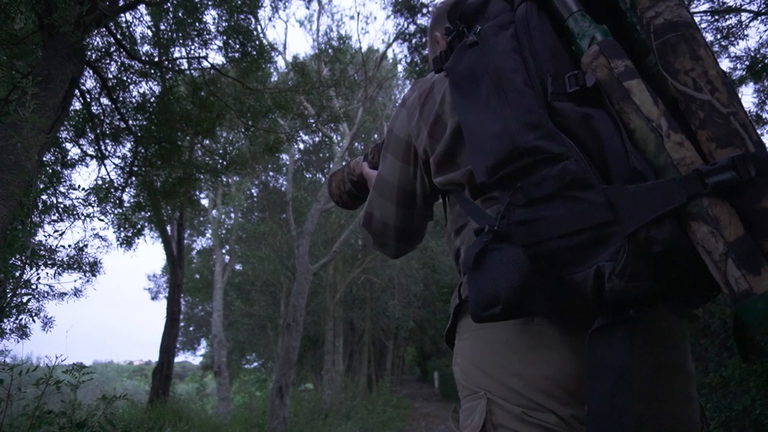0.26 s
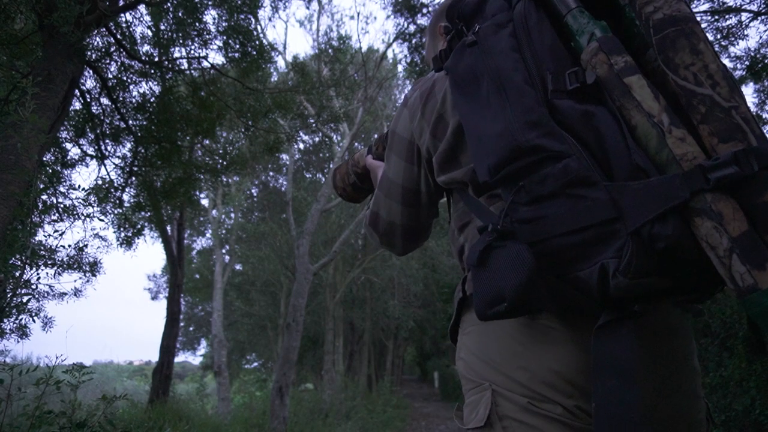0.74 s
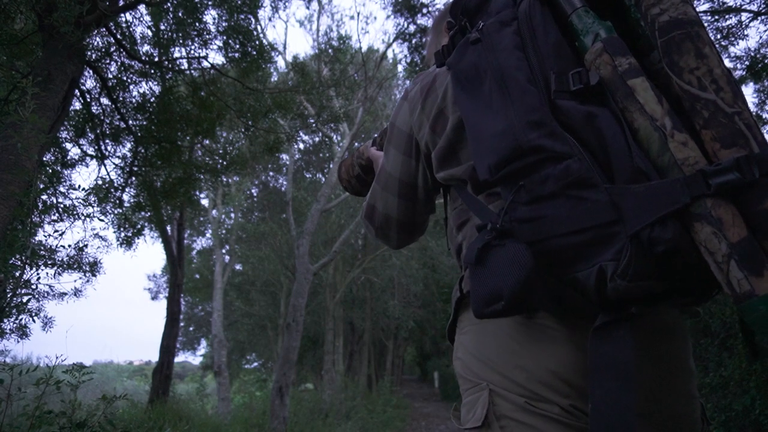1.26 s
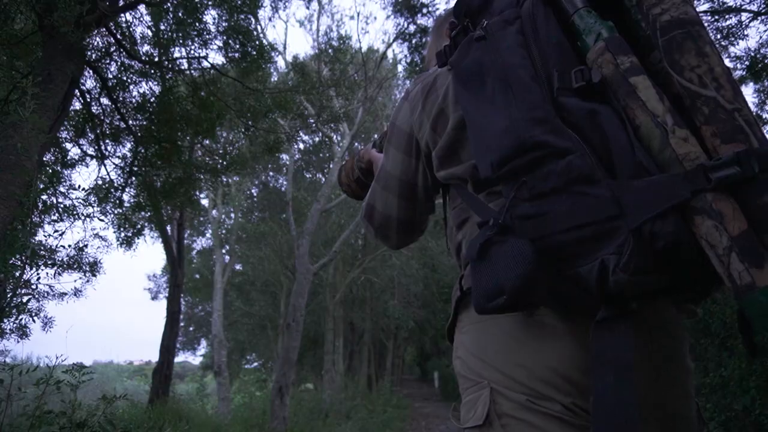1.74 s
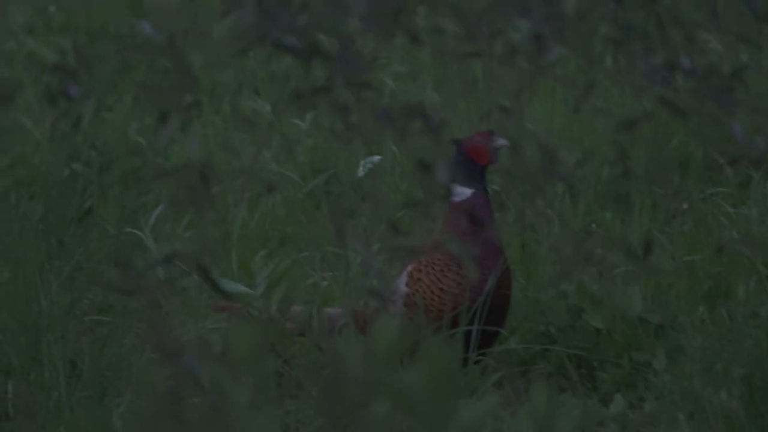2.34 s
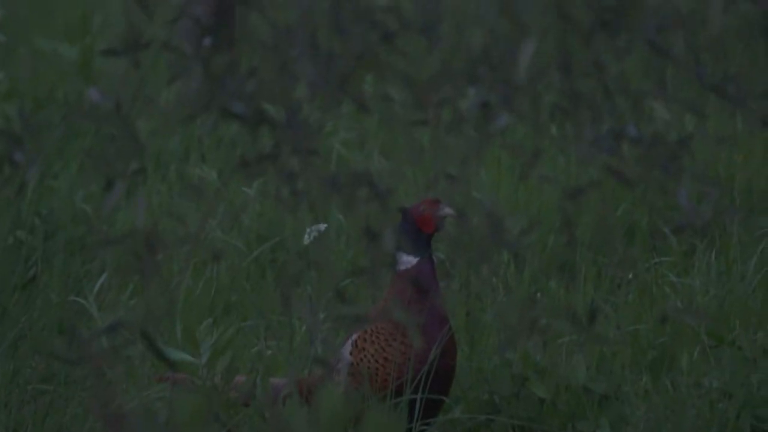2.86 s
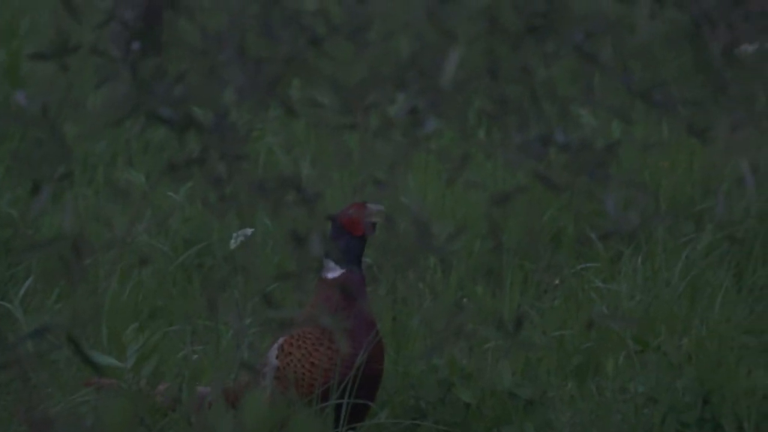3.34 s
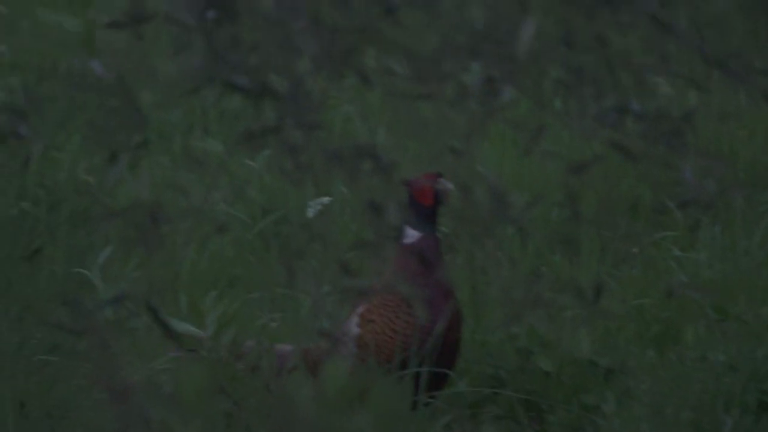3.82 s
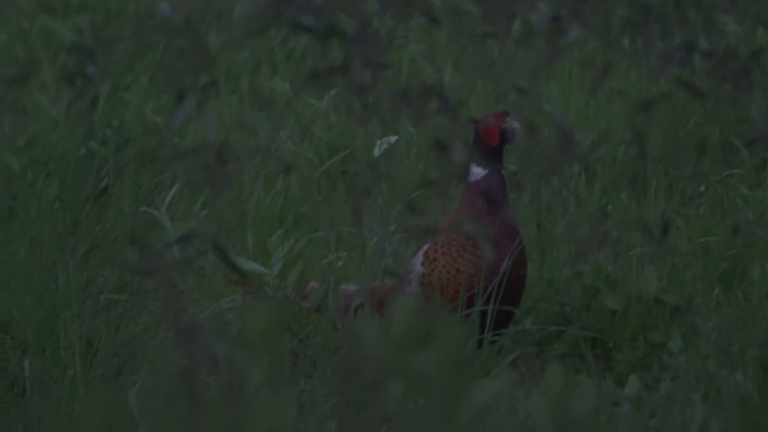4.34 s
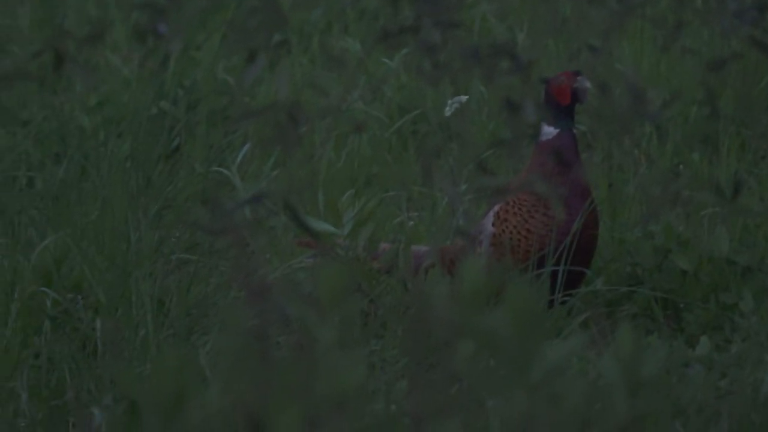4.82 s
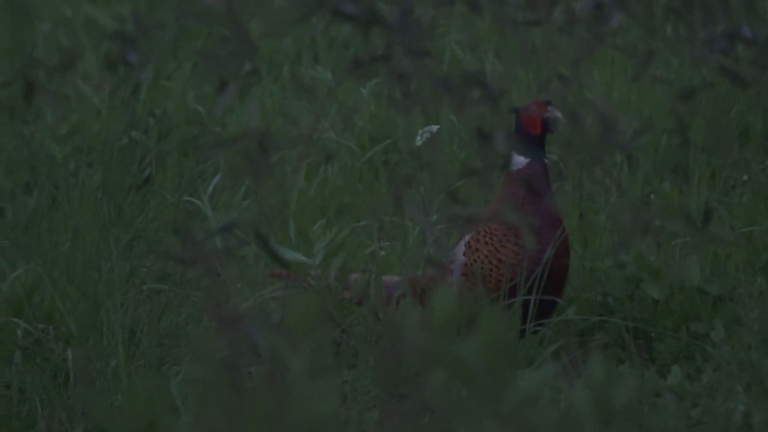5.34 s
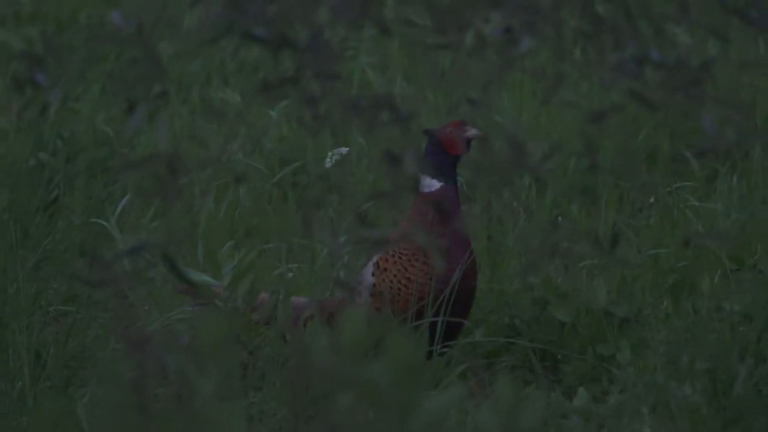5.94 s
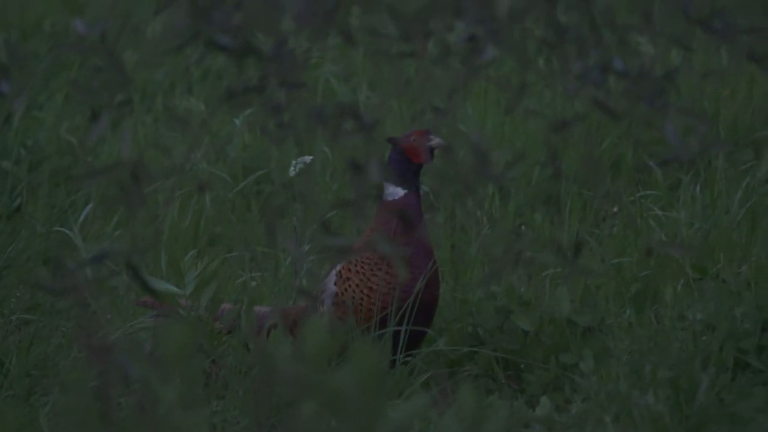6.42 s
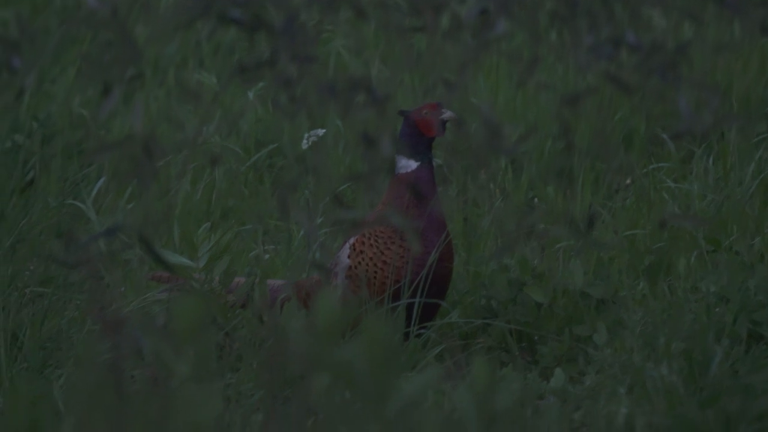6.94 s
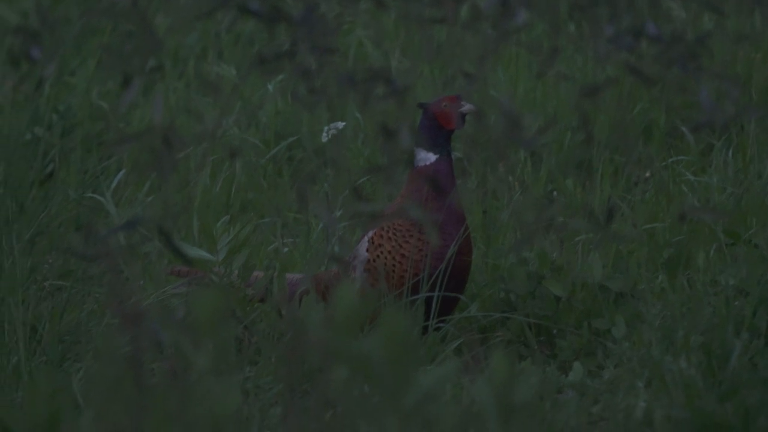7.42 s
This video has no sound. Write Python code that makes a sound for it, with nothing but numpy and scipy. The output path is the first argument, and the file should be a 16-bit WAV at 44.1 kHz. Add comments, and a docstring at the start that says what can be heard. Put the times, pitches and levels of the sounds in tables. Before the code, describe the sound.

A low, steady hush of still air lies over a woodland edge for about seven and a half seconds. Close to the microphone, a boot lands softly at around 0.2 seconds, with a rustle of leaf litter and clothing. Twigs snap sharply at about 0.5, 0.8 and 0.9 seconds, and the rustle fades away by about 2.3 seconds. A cock pheasant crows three times across the grass, at about 1.1, 3.4 and 5.6 seconds. Each crow is very short and loud: a high, harsh, rasping shriek followed by a quick stutter, with a brief echo among the trunks. Throughout, songbirds whistle and chirp faintly from deep in the trees. From about 4.6 to 5.7 seconds, one distant bird repeats a buzzy two-note chirp, a little softer each time. Only faint whistles and the quiet air remain at the end.

```python
"""A cock pheasant crows three times across the grass at a woodland edge, at dusk, on one microphone.
Each crow is a harsh shriek and a short stutter, sounded by the syrinx, rasping through the windpipe
and ringing on among the trunks. First, close by, a walker takes a last step on leaf litter and a few
twigs snap. Deep in the trees, songbirds whistle and chirp over a quiet hush of air."""
import sys
import numpy as np
from scipy import signal
from scipy.fft import rfft, irfft
from scipy.io import wavfile
from scipy.ndimage import uniform_filter1d

SR = 44100
rng = np.random.default_rng(int(sys.argv[2]) if len(sys.argv) > 2 else 0)


def dump(signal):
    """Clip the signal to [-1, 1] and save it as 16-bit WAV at the path in sys.argv[1]."""
    limited = np.clip(np.atleast_2d(signal).T, -1, 1)
    pcm = np.round(limited * 32767).astype(np.int16)
    wavfile.write(sys.argv[1], SR, pcm)


N = 338247
TIME = np.arange(N) / SR

# still evening air all around the microphone: frequency_hz, density_db
AIR_SPECTRUM = [(12, -35.5), (20, -3), (53, -1.5), (221, -5.5), (284, -5.5), (317, -6.5), (355, -6.5),
                (419, -8.5), (469, -8), (1320, -15), (1430, -18.5), (1890, -19), (2060, -23), (5170, -23),
                (15800, -27)]
# the farthest birds, blurred together: frequency_hz, gain_db
CHORUS_SPECTRUM = [(900, -37), (1500, -5.5), (2100, -1), (3000, -8.5), (4000, -11), (6000, -35)]
# how long the wood rings: frequency_hz, t60_s
ECHO_DECAY = [(400, 1), (1000, 0.6753), (2000, 0.77), (3450, 0.59), (3880, 0.68), (4300, .5), (5000, 0.5),
              (8000, 0.31), (14000, 0.54)]
# tone of the echo off the trunks: frequency_hz, gain_db
ECHO_SPECTRUM = [(400, -7), (850, -1), (1000, -4.5), (1200, -3.5), (2000, -9), (3000, -12.5), (3550, -13),
                 (3880, -14.5), (4150, -14), (5000, -9), (8000, -8), (14000, -11)]

# fluted whistles deep in the trees:
# start_s, length_s, level_db, start_hz, middle_hz, end_hz, swing_hz, swings_per_s
BIRD_WHISTLES = [ (.868, 0.27, -57, 1650, 1920, 1690, 87, 28),
                 (1.645, 0.36, -59.5, 2200, 2140, 2330, 200, 6.9),
                 (2.081, 0.19, -60, 2690, 2620, 2670, 102, 14), (3.95, 0.3, -69, 2080, 2110, 2123, 20, 8.7),
                 (4.614, 0.17, -60, 2275, 2280, 2240, 35, 8.5),
                 (5.13, 0.15, -63.5, 2580, 2480, 2520, 22, 10.4),
                 (6.043, 0.18, -64, 3280, 3390, 3360, 22, 12),
                 (6.364, 0.104, -64.5, 2080, 2027, 2080, 20, 9.6),
                 (6.718, 0.24, -68, 2990, 3000, 3030, 11, 8.3),
                 (6.835, 0.38, -62.5, 2400, 2180, 2160, 110, 3.1),
                 (7.27, 0.062, -61, 3300, 3200, 3260, 40, 20.2)]
# quick downward slurs: start_s, length_s, level_db, start_hz, end_hz
BIRD_SLURS = [(1.592, 0.028, -60, 2600, 2150), (2.303, 0.022, -55, 3045, 1390),
              (4.08, 0.055, -56, 3210, 2770), (4.468, .045, -63, 1700, 1250),
              (4.581, .11, -60.5, 3840, 3170), (6.2, .065, -58, 2864, 2190), (7.23, .07, -64.5, 1900, 1570)]
# the two notes of one bird's chirp:
# delay_s, length_s, level_db, start_hz, middle_hz, end_hz, buzz_share (of the pitch)
CHIRP_NOTES = [(0, .052, -55.5, 3300, 2860, 2916, .07), (.055, 0.04, -55, 1832, 2210, 1880, 0.083)]

# a boot rolls from heel to toe near the microphone: start_s, level_db, pitch_hz
BOOT_THUDS = [(0.1442, -26.5, 460), (0.1697, -27.5, 570), (0.179, -28.5, 216), (.199, -28, 492),
              (0.211, -20, 624)]
# twigs and stalks breaking: start_s, knock_db, pitch_hz, crack_db
TWIG_SNAPS = [(0.0287, -32, 3670, -37), (0.0723, -38.5, 650, -38), (0.4875, -20, 1550, -46),
              (0.4879, -19, 5700, -20.5), (0.523, -43.5, 889, -30), (0.7762, -25.5, 1240, -32),
              (0.944, -28.5, 1400, -28.5), (2.3086, -42, 1100, -43), (4.588, -36, 1870, -54),
              (4.9812, -50, 4000, -44.5)]
# tone of a sharp crack: frequency_hz, gain_db
CRACK_SPECTRUM = [(200, -19), (1000, 0.5), (3000, 3), (6000, -1.5), (9000, -2.5), (16000, -10.5)]
# the walker's weight shifts on the litter: peak_s, level_db
WEIGHT_SHIFTS = [(0.161, -38), (.21, -46), (.385, -52.5), (.5, -55), (.725, -56)]
# rubbing leaf litter and clothes: frequency_hz, density_db
RUSTLE_SPECTRUM = [(50, -61), (130, -16.5), (200, -6), (450, -1.5), (1000, -2), (2000, -3.5), (3050, -7.5),
                   (6000, -12), (8800, -14), (15500, -26.5)]

# the pheasant's syllables; a crow opens on a full push of air and stutters on what is left:
# start_s, length_s, fade_s, level_db, shriek_hz, rasp_db, low_note_db, push_share (0-1)
CROW_SYLLABLES = [ (1.1149, .026, 0.06, -17, 3950, -2.5, -12, .85),
                  (1.185, 0.019, 0.027, -25, 3840, 0.5, -10, 0.14),
                  (3.4395, 0.046, 0.059, -19, 3922, -3, -17, 0.87),
                  (3.501, 0.0081, .022, -19, 3764, 0.5, -15.5, 0.16),
                  (3.516, 0.0097, 0.027, -21.5, 3766, -4.5, -12.5, 0.06),
                  (5.623, 0.039, 0.089, -18.5, 3925, -2, -15, 0.99),
                  (5.695, .019, 0.024, -26.5, 3830, 2, -7.5, 0.07)]
# resonances of windpipe and beak with the shriek at WINDPIPE_PITCH_HZ: centre_hz, width_hz, gain_db
WINDPIPE_RESONANCES = [(1037, 80, -17), (2016, 400, -15.5), (2936, 290, -8), (3533, 400, -3),
                       (3765, 280, -2), (4925, 400, -3.5), (5940, 1000, -17.5), (8650, 830, -35)]
WINDPIPE_PITCH_HZ = 3920
# the broad rasp between those resonances: frequency_hz, gain_db
RASP_SPECTRUM = [(300, -70.5), (550, -34.5), (750, -25.5), (1300, -26.5), (2500, -13.5), (4400, -24.5),
                 (5600, -27.5), (7000, -36), (8000, -31), (9500, -34), (12000, -36.5), (16000, -49)]


def gain_of(db):
    """Decibels to an amplitude factor."""
    return 10 ** (np.asarray(db) / 20)


def unit_rms(x):
    """The signal scaled to rms 1."""
    return x / np.sqrt(np.mean(x ** 2) + 1e-20)


def phase_of(hz):
    """Running phase of a pitch curve, in radians."""
    return 2 * np.pi * np.cumsum(hz) / SR


def value_at(table, hz):
    """Looks up a table on a log-frequency axis."""
    table_hz, values = np.transpose(table)
    return np.interp(np.log(hz + 1), np.log(table_hz), values)


def add(mix, start_s, sound):
    """Lays a sound into the mix."""
    part = mix[max(round(start_s * SR), 0):][:len(sound)]
    part += sound[:len(part)]


def colour(x, spectrum, size=4096):
    """Minimum-phase filter with the given spectrum."""
    log_gain = np.log(gain_of(value_at(spectrum, abs(np.fft.fftfreq(size, 1 / SR)))))
    taps = np.fft.ifft(np.exp(np.conj(signal.hilbert(log_gain)))).real
    return signal.fftconvolve(x, taps[:size // 2])[:len(x)]


def wander(count, rate_hz):
    """Smooth random drift of rms about 1, up to the given rate."""
    spectrum = rfft(rng.standard_normal(count + SR))
    hz = np.arange(len(spectrum)) * SR / (count + SR)
    return unit_rms(irfft(spectrum / (1 + (hz / rate_hz) ** 4)))[:count]


def evening_air(level_db=-59):
    """A low, almost steady hush of air."""
    air = unit_rms(colour(rng.standard_normal(N), AIR_SPECTRUM, size=16384))
    return air * gain_of(level_db + 0.27 * wander(N, rate_hz=4))


def background_dip(start_s=2.36, depth_db=-7.5, recovery_s=2.55):
    """The level of the distant background drops abruptly, then slowly returns."""
    return gain_of(np.interp(TIME, [start_s - .05, start_s, start_s + recovery_s], [0, depth_db, 0]))


def distant_chorus(level_db=-65.5):
    """Birds so far off that they blur into a flickering band of noise."""
    blur = unit_rms(colour(rng.standard_normal(N), CHORUS_SPECTRUM))
    return blur * gain_of(level_db + 1.5 * wander(N, rate_hz=12)) * background_dip()


def wood_echo(x, near_db=0, near_t60_s=0.24, build_s=0.018, far_db=-0.5, echoes_per_s=3000):
    """Trunks scatter sound back: a quick spray from near ones, then a long tail that loses its treble."""
    t = np.arange(SR) / SR
    near, far = rng.standard_normal((2, SR)) * (rng.random((2, SR)) < echoes_per_s / SR)
    hz, frame_s, bands = signal.stft(far, SR, nperseg=256)
    decay = gain_of(-60 * frame_s / value_at(ECHO_DECAY, hz)[:, None])
    opening = np.minimum(t / build_s, 1)
    far = signal.istft(bands * decay, SR, nperseg=256)[1][:SR] * opening
    near = near * opening * gain_of(-60 * t / near_t60_s)
    response = gain_of(far_db) * far / np.linalg.norm(far) + gain_of(near_db) * near / np.linalg.norm(near)
    return signal.fftconvolve(x, colour(response, ECHO_SPECTRUM))[:N]


def arch(length_s, start_hz, middle_hz, end_hz):
    """A pitch that bends smoothly through three values."""
    parabola = np.polyfit([0, .5, 1], [start_hz, middle_hz, end_hz], 2)
    return np.polyval(parabola, np.linspace(0, 1, int(length_s * SR)))


def bird_note(hz, level_db, warble_share, taper=.5):
    """A whistle along a pitch curve, with a fast uneven warble."""
    warbled_hz = hz * (1 + warble_share * wander(SR // 2, rate_hz=190)[:len(hz)])
    return gain_of(level_db) * unit_rms(np.sin(phase_of(warbled_hz)) * signal.windows.tukey(len(hz), taper))


def faint_birds(level_db=-67.5, centre_hz=2130, spread_octaves=0.73, length_s=.11, count=20):
    """Birds far back in the wood drop in plain notes at random times and pitches."""
    out = np.zeros(N)
    for slot, (shift, pitch, size, *bends) in enumerate(rng.uniform(-1, 1, (count, 6))):
        start_s = (slot + .5 + shift / 2) / count * N / SR
        pitches_hz = centre_hz * 2 ** (spread_octaves * pitch) * (1 + .035 * np.array(bends))
        add(out, start_s, bird_note(arch(length_s, *pitches_hz), level_db + 3 * size, warble_share=.005))
    return out * background_dip()


def songbirds():
    """From deep in the trees: swinging whistles, and slurs that fall ever faster."""
    out = np.zeros(N)
    for start_s, length_s, level_db, *pitches_hz, swing_hz, swings_per_s in BIRD_WHISTLES:
        hz = arch(length_s, *pitches_hz)
        hz += swing_hz * np.cos(2 * np.pi * swings_per_s * TIME[:len(hz)])
        add(out, start_s, bird_note(hz, level_db, warble_share=.014, taper=0.1))
    for start_s, length_s, level_db, start_hz, end_hz in BIRD_SLURS:
        hz = arch(length_s, start_hz, start_hz + 0.306 * (end_hz - start_hz), end_hz)
        add(out, start_s, bird_note(hz, level_db, warble_share=0.037))
    return out


def chirping_bird(start_s=4.583, every_s=.162, fade_db_per_s=7, flutter_db=-8, count=7):
    """One far bird repeats a buzzy two-note chirp, a little softer each time."""
    out = np.zeros(N)
    for elapsed_s in np.arange(count) * every_s:
        for delay_s, length_s, level_db, *pitches_hz, buzz_share in CHIRP_NOTES:
            note = bird_note(arch(length_s, *pitches_hz), level_db - fade_db_per_s * elapsed_s, buzz_share)
            flutter = gain_of(flutter_db) * wander(SR // 2, rate_hz=455)[:len(note)]
            add(out, start_s + elapsed_s + delay_s, note * (1 + flutter))
    return out


def rustle_gain(opening_db=-50.5, fade_db_per_s=17.5, floor_db=-65.5, cutoff_s=2.29, cutoff_db_per_s=130,
                rise_s=0.022, fall_db_per_s=126.5):
    """The rustle swells at each shift of weight, fades gradually, then cuts off at about 2.3 s."""
    parts = [gain_of(opening_db - fade_db_per_s * TIME),
             gain_of(floor_db - cutoff_db_per_s * np.maximum(TIME - cutoff_s, 0))]
    for peak_s, level_db in WEIGHT_SHIFTS:
        rise = np.clip(1 + (TIME - peak_s) / rise_s, 0, 1)
        parts.append(rise * gain_of(level_db - fall_db_per_s * np.maximum(TIME - peak_s, 0)))
    return np.linalg.norm(parts, axis=0)


def rustle(patchy_db=2.5):
    """Litter and clothes close by: many small rubs, each brief and with a pitch range of its own."""
    bands = signal.stft(rng.standard_normal(N), nperseg=256)[2]
    patches = uniform_filter1d(rng.standard_normal(bands.shape), size=14, axis=0)
    patches = unit_rms(uniform_filter1d(patches, size=2, axis=1))
    rubs = signal.istft(bands * gain_of(patchy_db * patches), nperseg=256)[1][:N]
    return rustle_gain() * unit_rms(colour(rubs, RUSTLE_SPECTRUM))


def snap(knock_db, hz, t60_s, crack_db, crack_t60_s=0.0061, overtone_ratio=1.6, overtone_db=-7):
    """A sharp crack and a short damped knock of wood or ground."""
    t = np.arange(3000) / SR
    phase = 2 * np.pi * hz * t
    knock = np.sin(phase) + gain_of(overtone_db) * np.sin(overtone_ratio * phase)
    burst = rng.standard_normal(len(t)) * gain_of(crack_db - 60 * t / crack_t60_s)
    return knock * gain_of(knock_db - 60 * t / t60_s) + colour(burst, CRACK_SPECTRUM)


def walker(ring_cycles=12, tick_hz=3000, tick_count=7, low_cut_hz=130):
    """Near the microphone a boot lands, twigs break, dry stalks tick and the litter rustles."""
    out = np.zeros(N)
    for start_s, level_db, hz in BOOT_THUDS:
        add(out, start_s, snap(level_db, hz, t60_s=0.026, crack_db=-45))
    for start_s, knock_db, hz, crack_db in TWIG_SNAPS:
        add(out, start_s, snap(knock_db, hz, ring_cycles / hz, crack_db))
    for when, size in rng.random((tick_count, 2)):
        tick = snap(knock_db=-56, hz=tick_hz, t60_s=ring_cycles / tick_hz, crack_db=-47 + 3 * size)
        add(out, when * N / SR, tick)
    # the walker's sounds carry no deep bass
    return signal.sosfilt(signal.butter(2, low_cut_hz, "high", fs=SR, output="sos"), out + rustle())


def resonate(x, hz, width_hz):
    """A steep resonance of gain 1 that follows the curve hz."""
    carrier, pole = np.exp(1j * phase_of(hz)), np.exp(-np.pi * width_hz / SR)
    return 2 * (carrier * signal.lfilter([(1 - pole) ** 2], [1, -2 * pole, pole ** 2], x / carrier)).real


def windpipe_rasp(flaps, shriek_hz, flap_depth=0.49):
    """Puffs of air ring windpipe and beak, whose resonances follow the shriek; the level is held even."""
    puffs = (1 + flap_depth * flaps) * rng.standard_normal(len(flaps))
    rasp = colour(puffs, RASP_SPECTRUM)
    for centre_hz, width_hz, gain_db in WINDPIPE_RESONANCES:
        rasp += gain_of(gain_db) * resonate(puffs, centre_hz * shriek_hz / WINDPIPE_PITCH_HZ, width_hz)
    return rasp / np.sqrt(uniform_filter1d(rasp ** 2, size=500) + 1e-12)


def jittered_phase(hz, share, rate_hz, count):
    """Phase of a vibration whose pitch strays by a share of itself."""
    return phase_of(hz * (1 + share * wander(count, rate_hz)))


def syrinx(length_s, fade_s, top_hz, rasp_db, low_db, push, scoop_s=.0095, rest_hz=3846, flap_hz=310,
           swell_s=0.0057, shriek_fade_s=.015, low_hold_s=0.0015, count=6000):
    """One syllable: the two sides sound a shriek and a low note; uneven flapping chops shriek and rasp."""
    t = np.arange(count) / SR
    end_s = length_s + fade_s / 2
    # a harder push scoops the shriek up from farther below
    bends_s = [scoop_s / 2, scoop_s, max(0.62 * length_s, scoop_s), max(end_s, scoop_s)]
    shriek_hz = np.interp(t, bends_s, [top_hz * (1 - .125 * push), top_hz, top_hz, rest_hz])
    # the push raises the low note, which sags as the air runs out
    low_hz = (991.3 + 103.9 * push) * (1 - 0.098 * np.minimum(t / end_s, 1) ** 2)
    flaps = np.cos(jittered_phase(flap_hz, share=0.308, rate_hz=150, count=count))
    shriek = np.sin(jittered_phase(shriek_hz, share=.009, rate_hz=400, count=count)) * (1 + 0.2 * flaps)
    low_note = np.sin(jittered_phase(low_hz, share=.026, rate_hz=300, count=count))
    # the vibration builds exponentially; as pressure drops the shriek stops first, the rest lingers
    onset = gain_of(-36 * np.maximum(1 - t / swell_s, 0))
    after_s = np.maximum(t - length_s, 0)
    shriek = unit_rms(shriek) * gain_of(-20 * after_s / shriek_fade_s)
    rasp = windpipe_rasp(flaps, shriek_hz) * gain_of(rasp_db - 20 * after_s / fade_s)
    low_note = unit_rms(low_note) * gain_of(low_db - 20 * np.maximum(after_s - low_hold_s, 0) / fade_s)
    return onset * shriek + onset ** 2 * (rasp + low_note)


def pheasant(low_cut_hz=620):
    """Three crows, each a long syllable and a short stutter; the small beak radiates no bass."""
    out = np.zeros(N)
    for start_s, length_s, fade_s, level_db, *voice in CROW_SYLLABLES:
        add(out, start_s, gain_of(level_db) * syrinx(length_s, fade_s, *voice))
    return signal.sosfilt(signal.butter(4, low_cut_hz, "high", fs=SR, output="sos"), out)


def scene():
    """From the microphone: the pheasant across the grass, songbirds deep in the trees, the walker close."""
    crows = pheasant()
    song = songbirds() + chirping_bird() + faint_birds()
    underfoot = walker()
    echoes = wood_echo(crows + gain_of(-21.5) * underfoot)
    song_echoes = wood_echo(song, near_db=-3.5, near_t60_s=0.31, build_s=0.015)
    far_song = gain_of(-2.0) * song + gain_of(2.5) * song_echoes
    return (evening_air() + distant_chorus() + far_song + echoes + underfoot + crows)[None]


def record(dry):
    """The recorder passes nothing above a steep treble edge."""
    lowpass = signal.firwin(511, cutoff=15850, window=("kaiser", 9), fs=SR)
    return signal.oaconvolve(dry, lowpass[None], "same")


dry = scene()
out = record(dry)
dump(out)
```